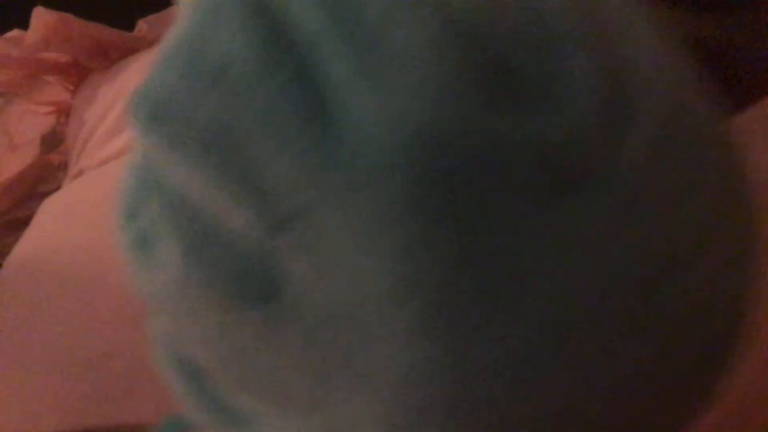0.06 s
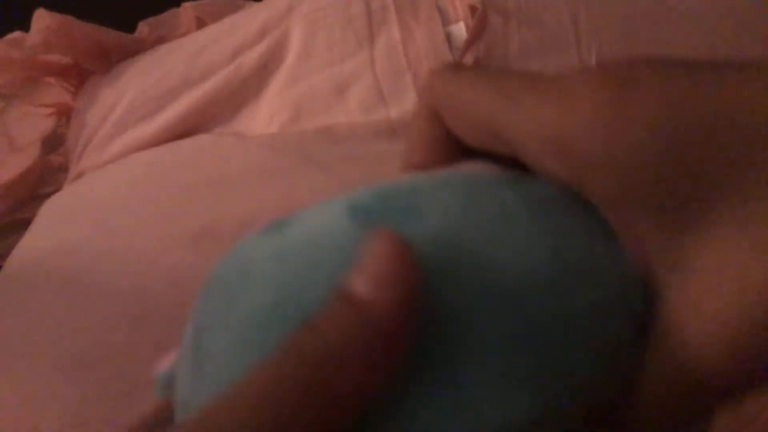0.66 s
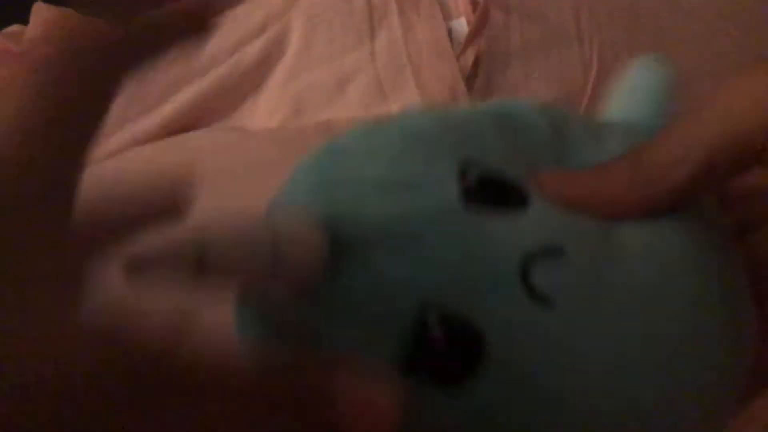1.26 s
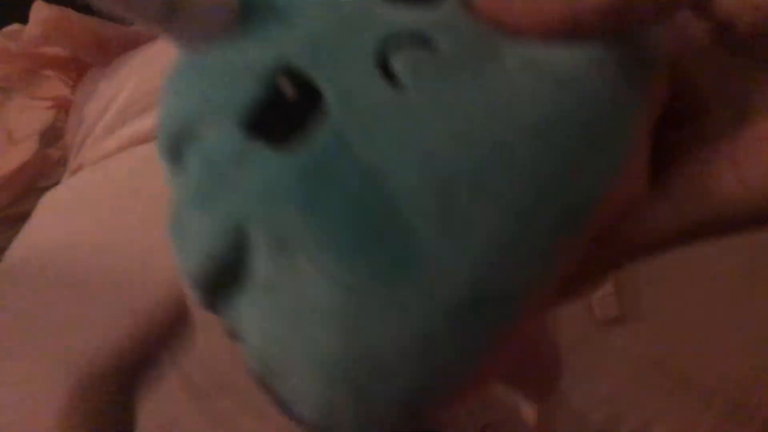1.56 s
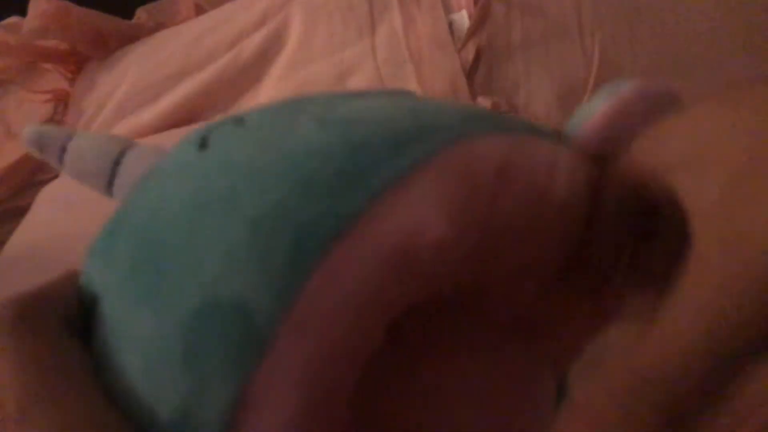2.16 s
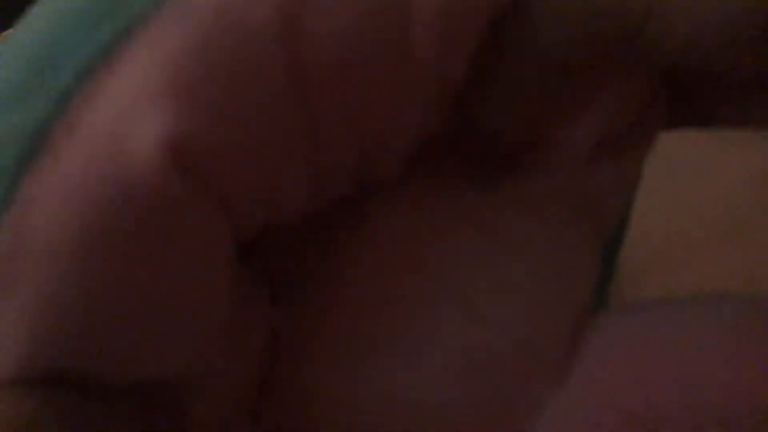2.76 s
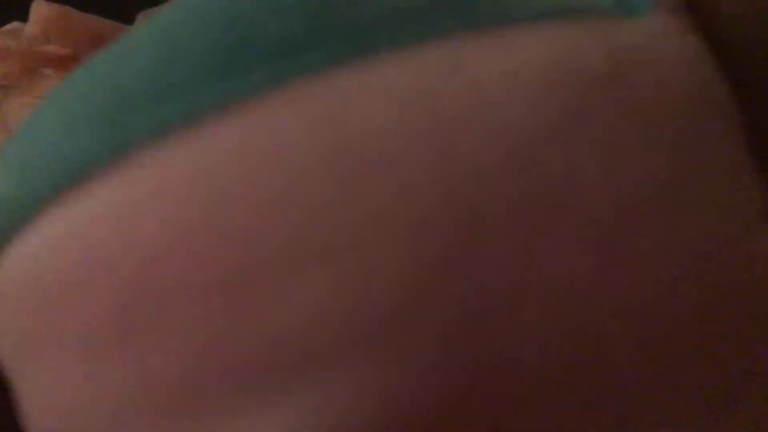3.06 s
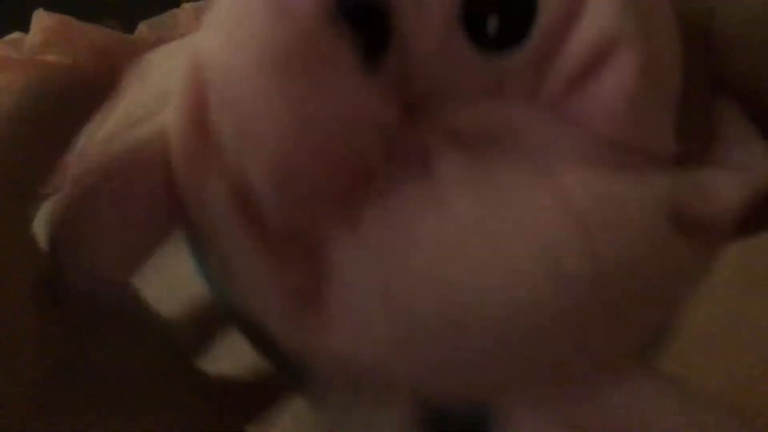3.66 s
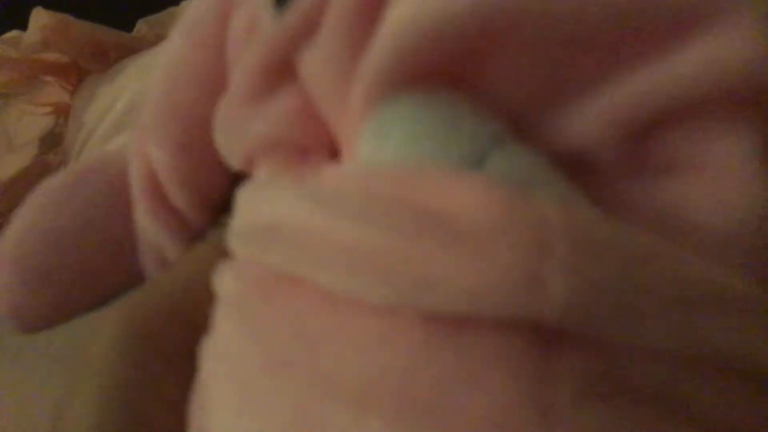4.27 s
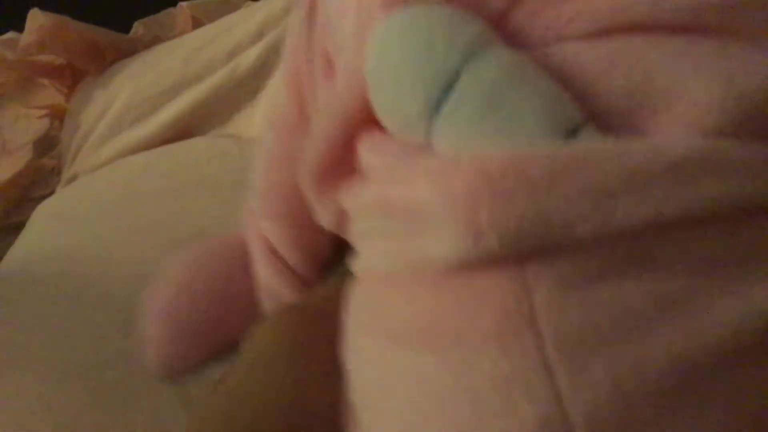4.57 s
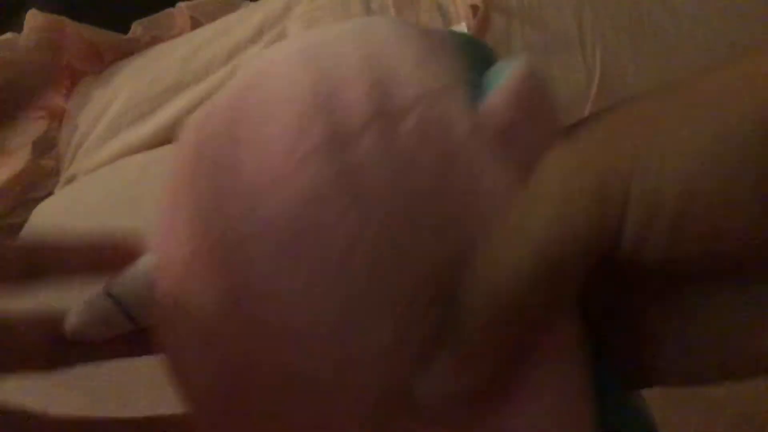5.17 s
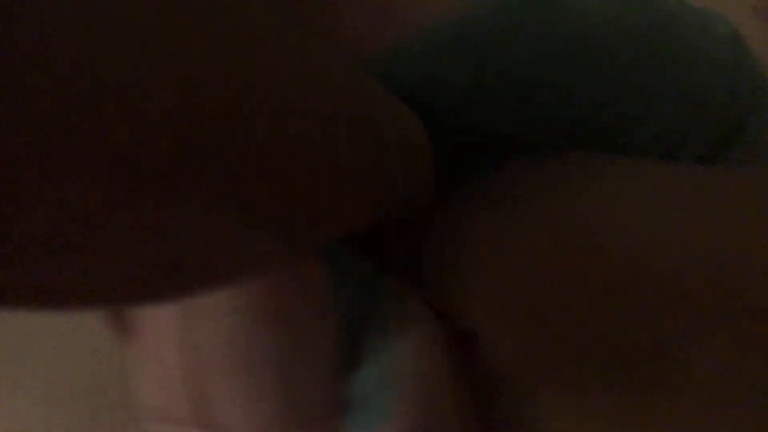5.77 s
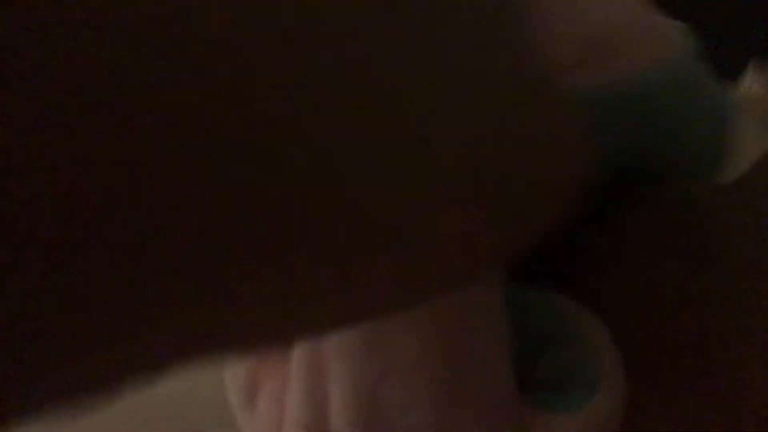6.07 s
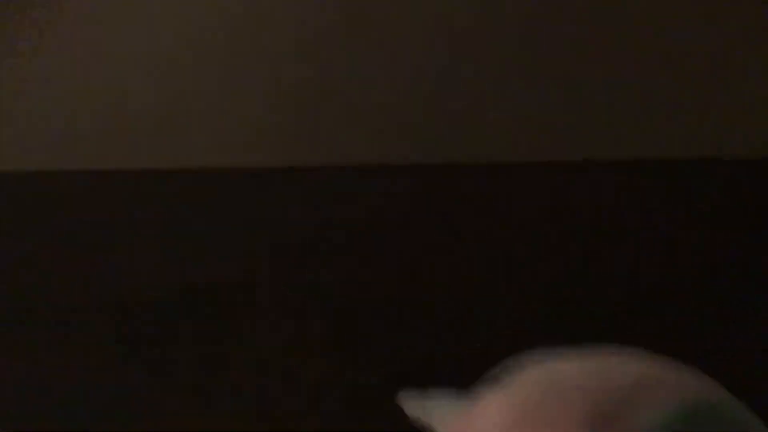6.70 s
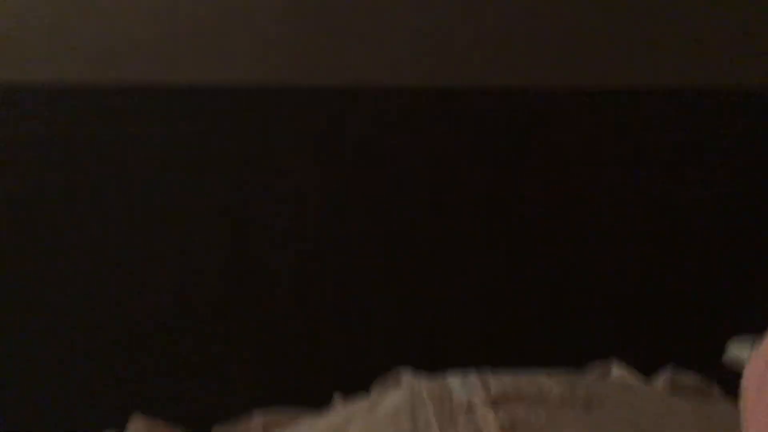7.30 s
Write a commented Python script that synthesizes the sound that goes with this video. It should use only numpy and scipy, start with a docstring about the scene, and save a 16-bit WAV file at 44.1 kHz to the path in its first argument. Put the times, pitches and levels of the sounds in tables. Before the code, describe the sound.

A fan's low hum and a soft wash of air fill a quiet bedroom throughout. From the start, hands squeeze and turn a plush toy close to the microphone, giving a faint fabric rustle in short, uneven strokes, with brief swishes around 0.7 and 1.1 seconds. A low rumble swells whenever the hand-held camera shifts. From about 4 seconds the rubbing becomes busier and slightly louder, with a soft bump near 4.8. Around 6 seconds come two light bumps, a faint clink and tiny finger ticks on the case. At 6.6 something briefly scuffs over the microphone, and at about 6.7 the camera takes one dull knock, by far the loudest sound, with a quick stumble of smaller thuds. The hum dips briefly and recovers. Two lighter bumps and more rustling follow at about 7.1 and 7.3 seconds.

```python
"""A quiet bedroom with a humming fan, where hands squeeze and turn a plush toy close to a hand-held camera.
Friction on weave, pile and stuffing makes a soft rustle, with brief swishes and faint bands of hiss.
Fingers tick on the case, one tap clinks faintly, and the camera rumbles and bumps as it is moved.
Near the end something scuffs over the microphone and the camera takes one dull knock, ducking the bass."""
import sys
import numpy as np
from scipy import signal
from scipy.fft import rfft, irfft, next_fast_len
from scipy.io import wavfile
from scipy.ndimage import uniform_filter1d

SR = 44100
rng = np.random.default_rng(int(sys.argv[2]) if len(sys.argv) > 2 else 0)


def store_pcm(level_fs):
    """Save levels as 16-bit WAV."""
    pcm = np.round(np.clip(level_fs, -1, 1) * 32767).astype(np.int16)
    wavfile.write(sys.argv[1], SR, np.atleast_2d(pcm).T)


N = 323694
T = np.arange(N) / SR

# hand strokes over the toy: (start [s], length [s], level [dB], pile offset [dB], stuffing offset [dB])
HAND_STROKES = [(0.0, .38, -81, -10, 3), (0.43, 0.18, -78.5, -0.5, -2), (0.605, 0.081, -70.5, -10, 7.5),
                (0.79, .11, -77.5, -4, -1), (0.959, 0.1, -75.5, -5, 0), (1.11, 0.085, -74.5, -6, 9),
                (1.47, 0.11, -80.5, -9.5, 8), (1.74, 0.44, -80, -10, 4), (2.36, 0.13, -79, -12, 5),
                (2.70, 0.32, -80, -14, 5), (2.92, .75, -76, -4.5, 0), (3.82, .26, -79, -6, 2),
                (4.09, .11, -70, -7, -1), (4.20, .15, -75.5, -7, 0), (4.35, .045, -73.5, -4, -2),
                (4.41, 0.31, -73.5, -10, 3), (4.753, 0.086, -71, -9, 3), (4.923, .10, -67.5, -8, -2),
                (5.028, .12, -75.5, -3, 7), (5.35, 0.14, -76, -5, -4), (5.707, .16, -71, -9, -4),
                (5.852, 0.13, -65, -10, -2.5), (5.99, 0.088, -69, -12, 3.5), (6.10, 0.16, -75, -19, 3),
                (6.323, 0.12, -73, -6, 1), (6.479, 0.13, -70, -9, 9.5), (6.902, .17, -74, -12, -14),
                (7.27, .12, -61.5, -5.5, 2)]
# faint rustle of the held toy, rising as it nears the microphone: (time [s], level [dB])
HOLDING_RUSTLE = [(0, -79.5), (1.4, -81), (2.6, -79.5), (3.9, -77), (5.4, -77), (6.3, -74.5), (7.3, -75)]
# the weave's papery mids: (frequency [Hz], relative level [dB])
WEAVE_EQ = [(900, -29.5), (1700, -4.5), (2500, 1.5), (4800, -3), (7000, -6.5), (9200, -14.5), (11000, -35)]
# the pile's fizzy top: (frequency [Hz], relative level [dB])
PILE_EQ = [(4000, -40), (7000, 2.5), (9200, 7.5), (10500, 1), (13000, 3), (15500, -1.5)]
# the stuffing's muffled body: (frequency [Hz], relative level [dB])
STUFFING_EQ = [(250, -13.5), (500, 4.5), (680, 16), (900, 8), (1300, 7.5), (1900, -3.5), (3000, -28.5)]
# hollows between hand, toy and case that colour a rub: (centre [Hz], width [Hz], boost [dB])
HOLLOW_PEAKS = [(1990, 530, 5.5), (2680, 300, 1), (3220, 130, 3), (3890, 200, 3.5), (4480, 240, 4),
                (5000, 200, 5), (5650, 190, 2), (6440, 340, 2.5)]
# brief swishes and squeaks, plus faint, longer narrow bands of hiss that tint the rustle:
# (midpoint [s], level [dB], nominal length [s], centre [Hz], width [octaves])
RUB_BANDS = [(0.664, -65.5, 0.019, 1600, 0.6), (1.02, -76, 0.04, 2200, 0.48),
             (1.117, -72, 0.011, 1600, 0.78), (1.517, -78, .1, 1590, 0.5), (1.955, -84, 0.38, 3000, .15),
             (2.792, -80.5, 0.26, 2700, 0.21), (4.16, -62, 0.067, 684, 0.088),
             (4.366, -71.5, 0.048, 2300, .5), (4.367, -71, 0.02, 3950, 0.091),
             (4.37, -59.5, 0.059, 685, 0.078), (4.588, -80.5, 0.32, 4500, 0.09),
             (4.773, -70, 0.025, 4900, 0.48), (4.936, -64.5, 0.028, 5030, 0.26),
             (4.972, -68, 0.04, 6900, 0.58), (5.009, -61, 0.0083, 3470, 0.74), (5.863, -66, 0.3, 635, 0.24),
             (5.92, -70, .09, 2300, .6), (6.044, -65.5, 0.055, 2400, 0.55), (6.095, -57, 0.011, 2200, 1.26),
             (6.185, -78, 0.17, 3000, 0.17), (7.128, -60.5, 0.014, 4500, 0.16),
             (7.134, -56.5, 0.011, 2870, 0.73), (7.278, -59.5, 0.0077, 3450, 1.2)]
# hits on the camera: (time [s], level [dB], thud pitch [Hz], contact time [s], crack send [dB])
CAMERA_HITS = [(4.789, -40, 59, 0.0039, -40), (5.943, -31, 226, 0.00073, -30),
               (6.088, -32.5, 165, .001, -30), (6.582, -25, 130.4, 0.00072, -27),
               (6.616, -27, 61, 0.0034, -40), (6.7424, -5.5, 107.9, 0.00017, -6),
               (6.7615, -13.5, 84, 0.001, -40), (6.784, -24.5, 115, .002, -40),
               (6.807, -32, 91, 0.0017, -36), (7.13, -25, 184, 0.0018, -40),
               (7.312, -32, 230, 0.00066, -23)]
# ring of the camera and the hand around it: (frequency [Hz], relative level [dB], t60 [s])
CAMERA_MODES = [(71.6, -12, 0.32), (146, -7.5, 0.08), (234, -10.5, 0.084), (280.4, -13, 0.086),
                (410, -15.5, 0.031), (573, -13.5, 0.045), (622, -18, 0.052), (1450, -17, 0.01),
                (1900, -6, 0.007)]
# the hard crack of the case: (frequency [Hz], relative level [dB])
CRACK_EQ = [(300, -7), (900, -6), (2100, -13), (3000, -8), (4200, -25), (5300, -9.5), (6500, -20),
            (8600, -10), (10500, -29), (14000, -20), (16000, -24)]
# rasp at the microphone port: (frequency [Hz], relative level [dB])
SCUFF_EQ = [(60, -8), (200, 7.5), (450, 3.5), (850, 4), (1300, -10), (2200, -7), (3800, 0.5), (5000, -3.5),
            (7000, -6.5), (9000, -10), (12000, -18), (15500, -15.5)]
# ticks on the case, mostly fingers, one the click of the camera's rebound after the knock: (time [s], level
# [dB], centre [Hz], t60 [s])
CASE_TICKS = [(6.059, -64, 7000, .006), (6.276, -65, 7000, .008), (6.363, -60, 7000, .006),
              (6.371, -60, 12000, 0.0073), (6.4607, -42.5, 3550, 0.0074), (6.638, -58, 7000, .005),
              (6.7273, -49.5, 1590, 0.0054), (6.76, -53, 2380, 0.027), (6.7675, -54, 7000, 0.013),
              (7.157, -69, 5500, .015)]
# ring of one light tap: (frequency [Hz], level [dB], t60 [s])
CLINK_MODES = [(735, -52, .09), (1370, -51.5, 0.066)]
# shifts of the camera in the hand: (start [s], length [s], level [dB])
CAMERA_SHIFTS = [(0.24, .26, -57), (2.14, .22, -57), (2.553, 1.4, -56.5), (4.55, .3, -55), (5.88, .32, -54),
                 (6.48, 0.13, -51), (7.1, .3, -48.5)]
# low end of the handling noise: (frequency [Hz], relative level [dB])
RUMBLE_EQ = [(20, -35.5), (35, -20.5), (45, -11.5), (56, 6.5), (66, 13.5), (90, -1), (200, -51)]
# partials of the fan's hum: (harmonic [number], relative level [dB])
HUM_PARTIALS = [(1, 0.5), (2, -37), (3, -14.5), (4, -37.5)]
# the hum swells and sinks a little as the camera moves about: (time [s], level before trim [dB])
HUM_RIDE = [(0.05, -37.5), (0.77, -36), (0.85, -38), (1.3, -37.5), (1.33, -35.5), (1.95, -38), (5.59, -36),
            (5.66, -38), (6.24, -35), (6.55, -39)]
# moving room air and microphone hiss: (frequency [Hz], relative level [dB])
AIR_EQ = [(25, -53), (60, 5.5), (100, 5), (180, 0), (260, 0), (370, -5), (430, -15), (680, -15),
          (850, -25.5), (1250, -30.5), (1600, -38.5), (4500, -64), (9000, -48.5), (11000, -53)]


def plush_rustle(weave_db=-1, pile_db=-2, stuffing_db=-3, uneven_grip_db=1.0):
    """One sliding motion sounds the weave, the fine pile and the soft stuffing; the grip is uneven."""
    weave_drive, pile_drive, stuffing_drive = hand_drive()
    weave = hollows_and_folds(colour(friction(2000, 0.34), WEAVE_EQ), flicker_db=0.83)
    pile = hollows_and_folds(colour(friction(1500, 0.28), PILE_EQ), flicker_db=1.8)
    stuffing = hollows_and_folds(colour(friction(620, 0.33), STUFFING_EQ), flicker_db=0.5)
    rustle = amp(weave_db) * weave_drive * weave
    rustle += amp(pile_db) * pile_drive * pile
    rustle += amp(stuffing_db) * stuffing_drive * stuffing
    return amp(uneven_grip_db * drift(rate_hz=35)) * rustle


def hand_drive(held_pile_db=-8.5, held_stuffing_db=0):
    """Envelopes for weave, pile and stuffing: strokes add in power to the rustle of holding."""
    power = np.outer(amp([0, held_pile_db, held_stuffing_db]), ride(HOLDING_RUSTLE)) ** 2
    for start, length, db, pile_db, stuffing_db in HAND_STROKES:
        power += np.outer(amp([db, db + pile_db, db + stuffing_db]), swell(start, length)) ** 2
    return np.sqrt(power)


def friction(snags_per_s, snag_share):
    """Countless tiny slips blur to a hiss, and some fibres snag and snap free."""
    snags = rng.standard_normal(N) * (rng.random(N) < snags_per_s / SR)
    return np.sqrt(1 - snag_share) * rng.standard_normal(N) + np.sqrt(snag_share) * unit(snags)


def hollows_and_folds(x, flicker_db, patch_bins=9, patch_frames=25, size=512):
    """Hollows leave mild peaks in the tone, and moving folds make small patches of it come and go."""
    hz, _, spectra = signal.stft(x, SR, nperseg=size)
    patches = uniform_filter1d(rng.standard_normal(spectra.shape), patch_bins, axis=0)
    patches = uniform_filter1d(patches, patch_frames, axis=1)
    peaks_db = sum(db / (1 + (2 * (hz - centre) / width) ** 2) for centre, width, db in HOLLOW_PEAKS)
    moving_eq = amp(peaks_db[:, None] + flicker_db * unit(patches))
    return unit(signal.istft(spectra * moving_eq, nperseg=size)[1][:N])


def rub_bands(taper=0.74):
    """Bands of grainy friction swell and fade: short ones swish or squeak, long ones tint the rustle."""
    out = np.zeros(N)
    grain = friction(snags_per_s=1800, snag_share=0.45)
    for midpoint, db, length, hz, octaves in RUB_BANDS:
        span = 1.5 * length  # room for the fades
        start = midpoint - span / 2
        rub = grain[round(start * SR):][:round(span * SR)]
        fades = signal.windows.tukey(len(rub), taper)
        add(out, start, amp(db) * band(rub, hz, octaves) * fades)
    return out


def camera_knocks(crack_trim_db=8, size=16384):
    """Each contact pushes the camera into a thud and a short ring; a hard one also cracks on the case."""
    out, t = np.zeros(N), np.arange(size) / SR
    log_gain = np.log(gain_at(CRACK_EQ, abs(np.fft.fftfreq(size, 1 / SR))))
    minimum_phase = np.exp(np.conj(signal.hilbert(log_gain)))  # packs the energy into the attack
    crack = amp(crack_trim_db) * np.fft.ifft(minimum_phase).real
    ring = np.zeros(size)
    for hz, db, t60 in CAMERA_MODES:
        build = 1 - np.exp(-(t * hz) ** 2)  # a mode takes about a cycle to build
        ring += amp(db - 60 * t / t60) * build * np.sin(2 * np.pi * hz * t)
    for start, db, hz, contact_s, crack_db in CAMERA_HITS:
        push = t * np.exp(-t / (contact_s / 2))  # a long contact is soft and dull
        body = signal.fftconvolve(thud(t, hz) + ring, push / push.sum())[:size]
        add(out, start, amp(db) * (body + amp(crack_db) * crack))
    return out


def thud(t, rest_hz, stiffening=2.32, sink_s=0.0028, rise_s=0.0032, hold_s=0.018):
    """The soft grip yields under a blow: the pitch sinks to rest, and the hand soon stops the swing."""
    pitch_hz = rest_hz * (1 + stiffening * np.exp(-t / sink_s))
    envelope = (1 - np.exp(-t / rise_s)) * np.exp(-(t / hold_s) ** 6)
    return envelope * np.sin(2 * np.pi * np.cumsum(pitch_hz) / SR)


def mic_scuff(peak_db=-27.5, rise_db_per_s=1250, fall_db_per_s=1400):
    """Friction right at the microphone port: loud, broadband and coloured by the case."""
    touch_s, press_s, ease_s, lift_s = 6.580, 6.599, 6.608, 6.631
    rasp = hollows_and_folds(colour(friction(3000, 0.32), SCUFF_EQ), flicker_db=0.5)
    fade_in_db = rise_db_per_s * np.minimum(T - press_s, 0)
    fade_out_db = fall_db_per_s * np.minimum(ease_s - T, 0)
    touching = (T > touch_s) & (T < lift_s)
    return touching * amp(peak_db + fade_in_db + fade_out_db) * rasp


def case_ticks(size=2048):
    """Fingers catch the case, and the knocked camera clicks once as it rebounds: tiny dry clicks that die
    within milliseconds."""
    out, t = np.zeros(N), np.arange(size) / SR
    for start, db, hz, t60 in CASE_TICKS:
        add(out, start, amp(db - 60 * t / t60) * band(rng.standard_normal(size), hz, octaves=0.98))
    return out


def clink(tap_s=6.094, size=8192):
    """Something small and hard is tapped and rings briefly."""
    out, t = np.zeros(N), np.arange(size) / SR
    for hz, db, t60 in CLINK_MODES:
        add(out, tap_s, amp(db - 60 * t / t60) * np.sin(2 * np.pi * hz * t))
    return out


def handling_rumble(still_db=-66):
    """The hand-held camera carries a low bed of rumble that swells whenever it shifts."""
    shift_power = sum((amp(db) * swell(start, length)) ** 2 for start, length, db in CAMERA_SHIFTS)
    return np.sqrt(amp(still_db) ** 2 + shift_power) * colour(rng.standard_normal(N), RUMBLE_EQ)


def fan(hum_hz=80.78, wander_hz=0.12, overtone_waver_db=2.5, hum_trim_db=-0.5, air_db=-48.5):
    """The room tone: a fan's low hum with wavering overtones, over a wash of moving air."""
    cycles = np.cumsum(hum_hz + wander_hz * drift(rate_hz=2.02)) / SR
    hum = np.zeros(N)
    for harmonic, db in HUM_PARTIALS:
        waver_db = (harmonic > 1) * overtone_waver_db * drift(rate_hz=4.9)
        hum += amp(db + waver_db) * np.sqrt(2) * np.sin(2 * np.pi * harmonic * cycles)
    air = colour(rng.standard_normal(N), AIR_EQ)
    return amp(hum_trim_db) * ride(HUM_RIDE) * hum + amp(air_db) * air


def swell(start, length, rise_share=0.36, fall_share=0.45):
    """One hand movement gathers speed, holds and dies away; the ramps take shares of its length."""
    progress = (T - start) / length
    return np.clip(np.minimum(0.5 + progress / rise_share, 0.5 + (1 - progress) / fall_share), 0, 1)


def ride(points):
    """A fader ride: the gain at every sample from (time [s], level [dB]) points."""
    times, db = np.transpose(points)
    return amp(np.interp(T, times, db))


def drift(rate_hz):
    """Smooth random modulation at rms 1, rolling off above the given rate."""
    white = rfft(rng.standard_normal(4096))
    hz = np.arange(len(white)) / T[-1]
    slow = irfft(white / (1 + (hz / rate_hz) ** 2))
    return unit(np.interp(T, np.linspace(0, T[-1], len(slow)), slow))


def colour(x, eq):
    """Shapes a noise with an EQ curve, at rms 1."""
    size = next_fast_len(len(x))
    gain = gain_at(eq, np.fft.rfftfreq(size, 1 / SR))
    return unit(irfft(rfft(x, size) * gain, size)[:len(x)])


def band(x, hz, octaves):
    """Keeps a bell-shaped band of a noise, at rms 1."""
    away = np.log2((np.fft.rfftfreq(len(x), 1 / SR) + 1) / hz) / octaves
    return unit(irfft(rfft(x) * np.exp(-0.5 * away ** 2), len(x)))


def gain_at(eq, hz):
    """Reads an EQ curve on a log-frequency axis."""
    eq_hz, db = np.transpose(eq)
    return amp(np.interp(np.log(hz + 1), np.log(eq_hz), db))


def add(mix, start_s, sound):
    """Drops a sound into the mix at its cue."""
    part = mix[round(start_s * SR):][:len(sound)]
    part += sound[:len(part)]


def amp(db):
    """Decibels to gain."""
    return 10 ** (np.asarray(db) / 20)


def unit(x):
    """Scales to rms 1."""
    return x / np.sqrt(np.mean(x ** 2) + 1e-20)


def scene():
    """Room tone, plush toy and camera handling at one microphone."""
    room_tone = fan()
    toy = plush_rustle() + rub_bands()
    handling = mic_scuff() + case_ticks() + clink() + camera_knocks() + handling_rumble()
    return (toy + handling + room_tone)[None]


def record(dry, threshold_db=-31, slope=0.43, release_db_per_s=48, split_hz=260, attack_s=0.035):
    """Gain control ducks the bass after loud sounds and eases it back; a steep low-pass trims the top."""
    x = dry[0]
    level_db = 10 * np.log10(abs(uniform_filter1d(x ** 2, size=512)) + 1e-12)
    release_db = T * release_db_per_s
    held_peak_db = np.maximum.accumulate(level_db + release_db) - release_db
    over_db = np.maximum(held_peak_db - threshold_db, 0)
    lag = np.exp(-1 / (attack_s * SR))
    duck_db = slope * signal.lfilter([1 - lag], [1, -lag], over_db)
    bass = signal.sosfiltfilt(signal.butter(2, split_hz, fs=SR, output="sos"), x)
    ducked = x - bass * (1 - amp(-duck_db))
    low_pass = signal.firwin(511, cutoff=15850, window=("kaiser", 9), fs=SR)
    return signal.oaconvolve(ducked, low_pass, "same")[None]


dry = scene()
out = record(dry)
store_pcm(out)
```